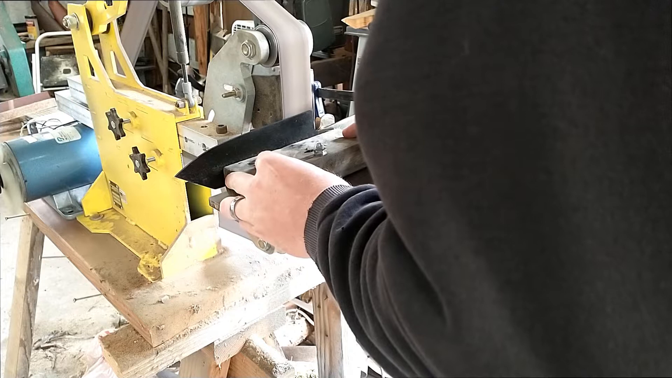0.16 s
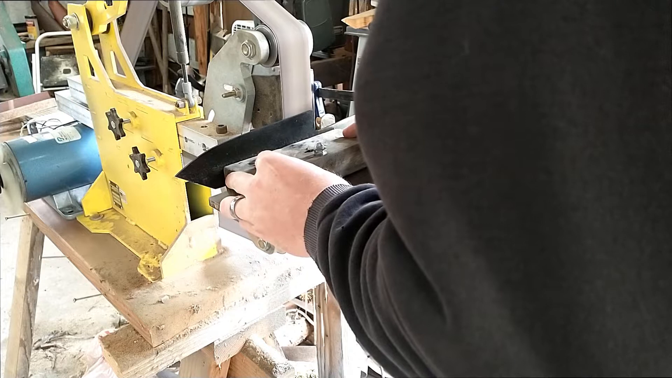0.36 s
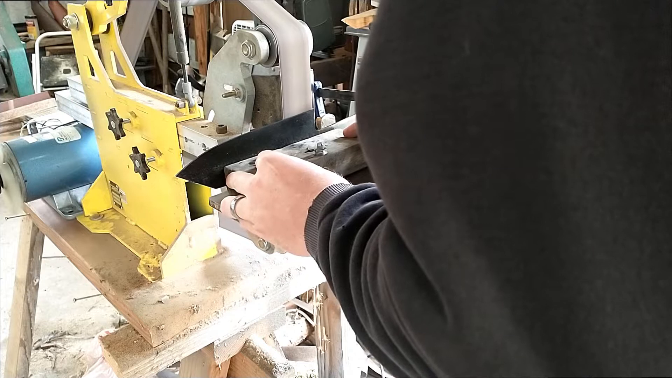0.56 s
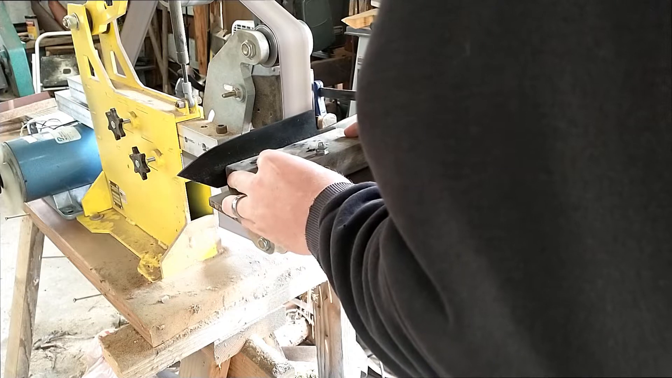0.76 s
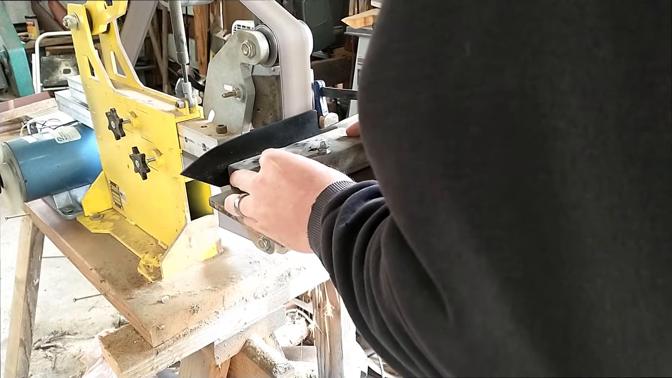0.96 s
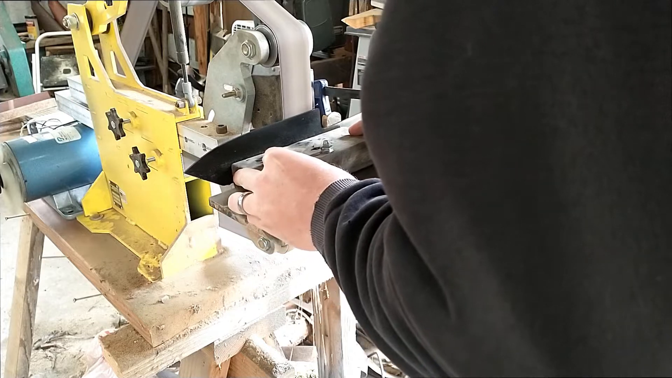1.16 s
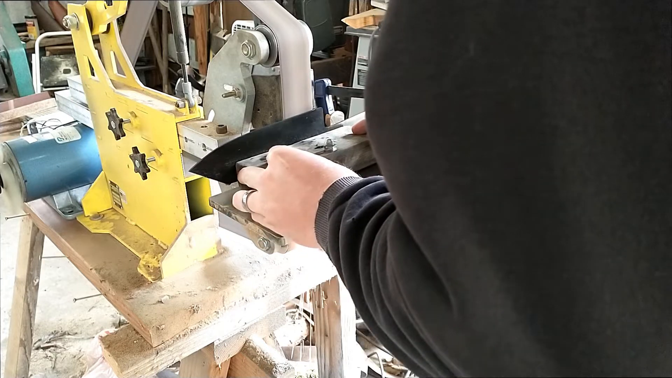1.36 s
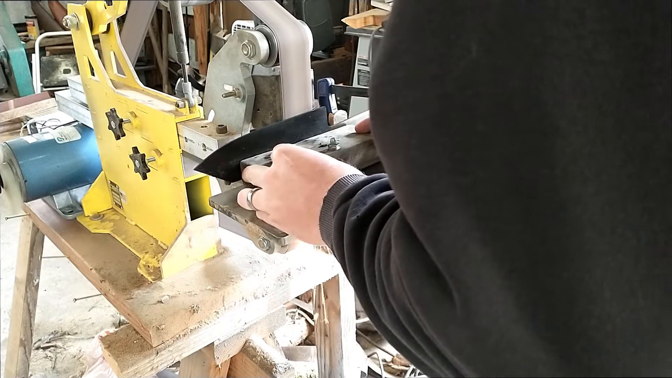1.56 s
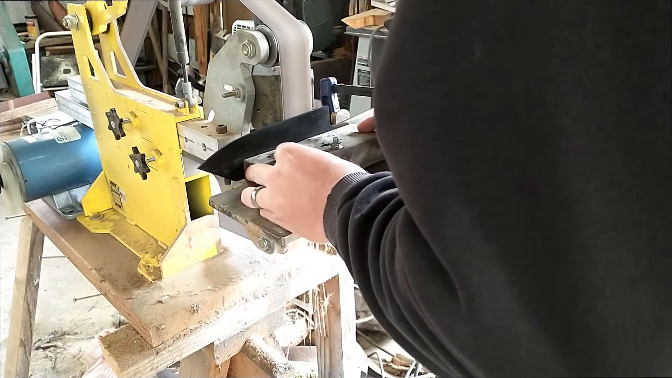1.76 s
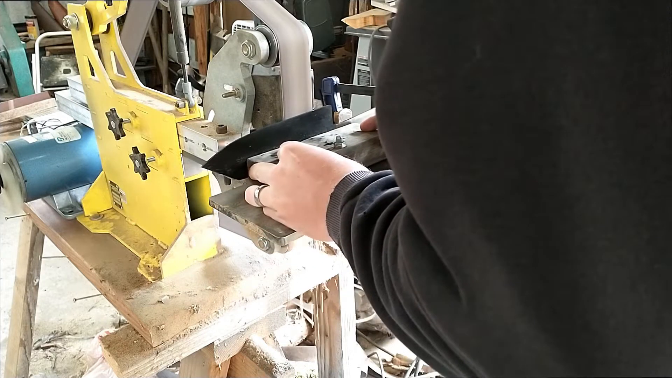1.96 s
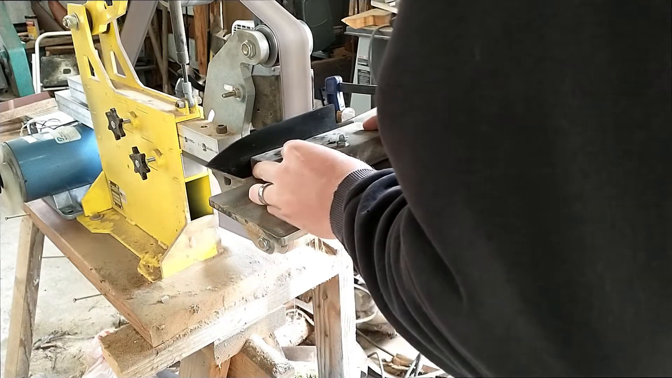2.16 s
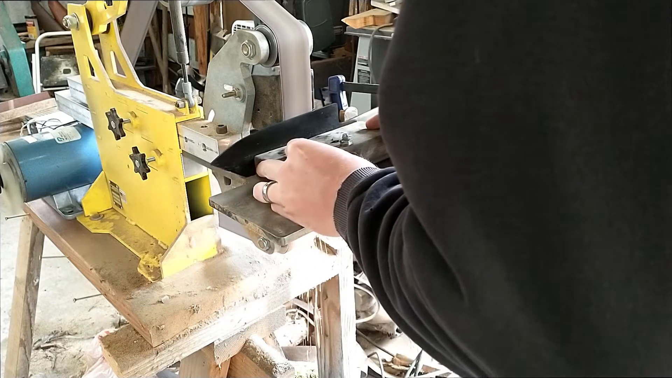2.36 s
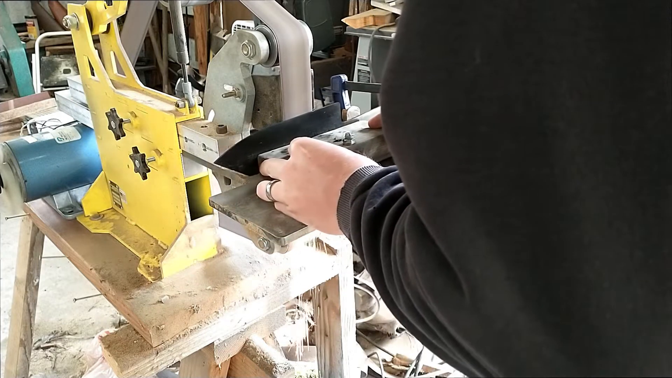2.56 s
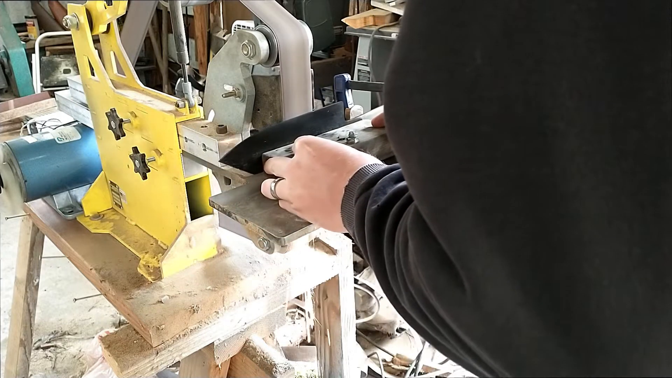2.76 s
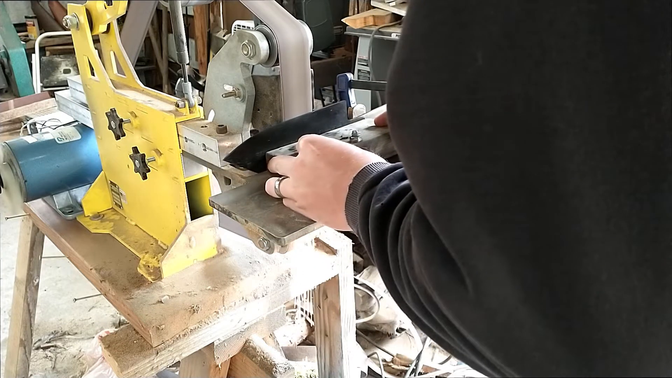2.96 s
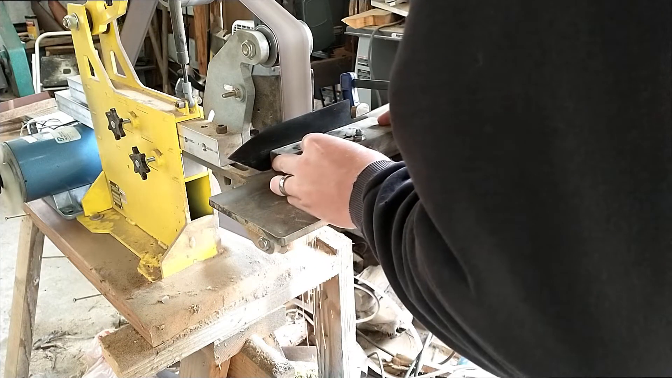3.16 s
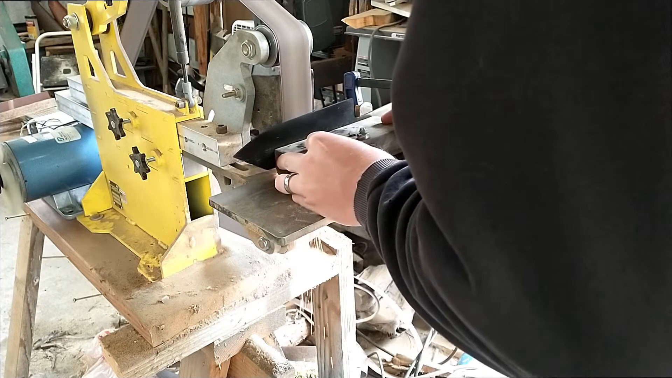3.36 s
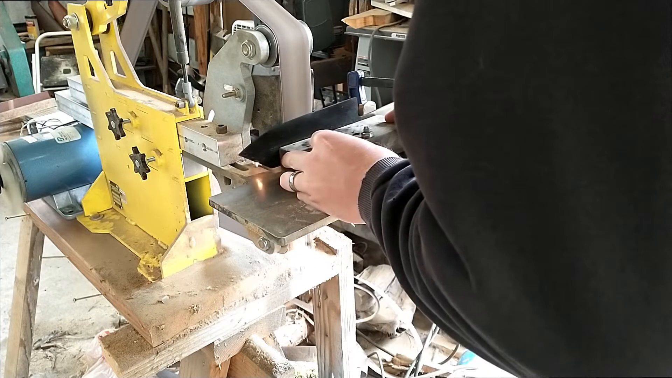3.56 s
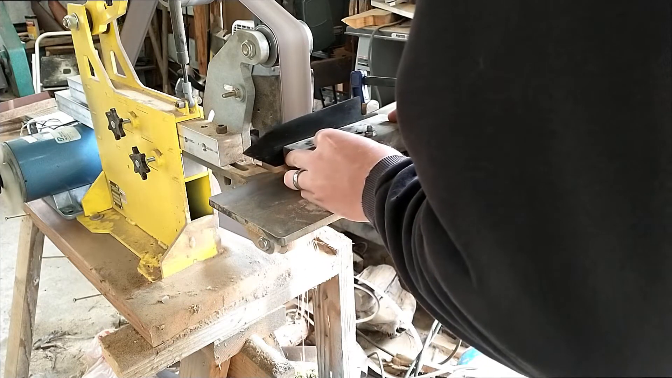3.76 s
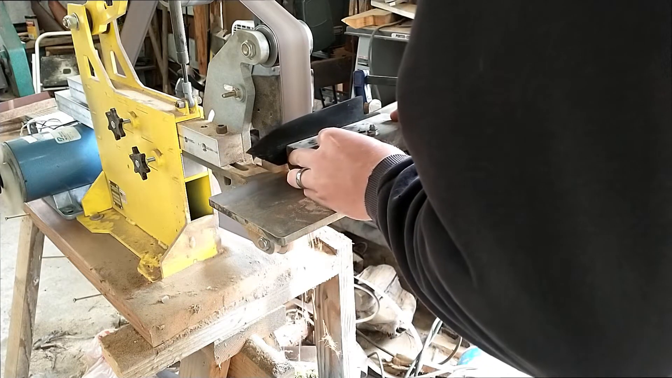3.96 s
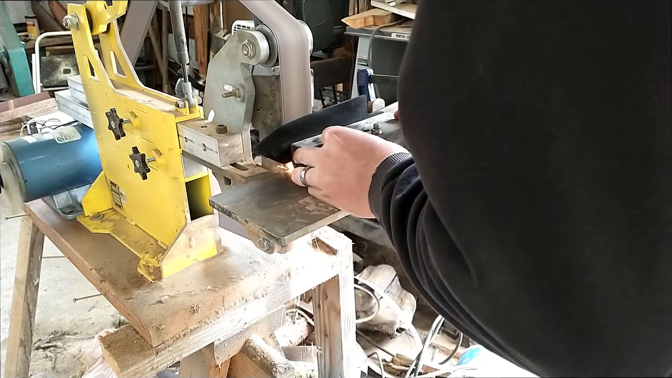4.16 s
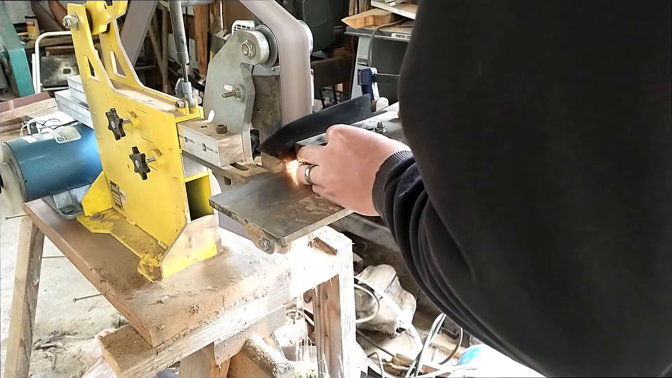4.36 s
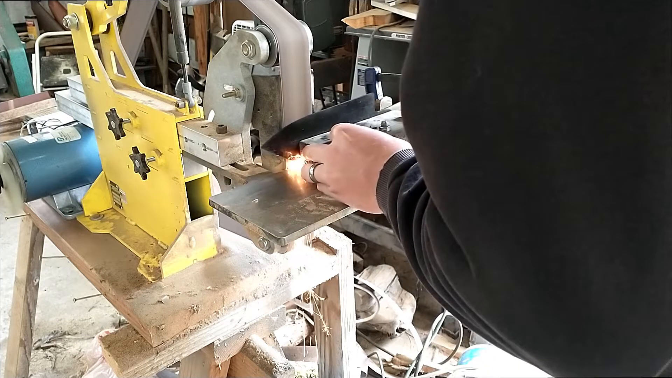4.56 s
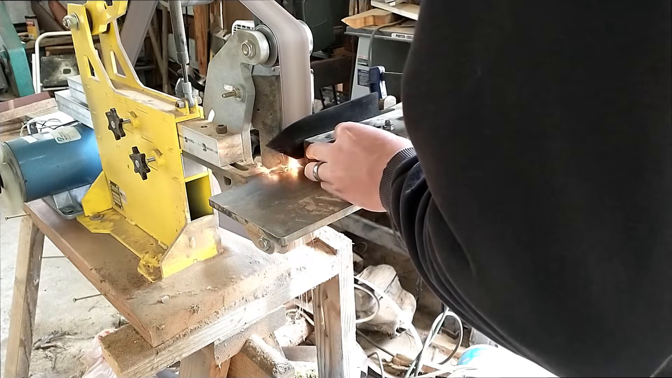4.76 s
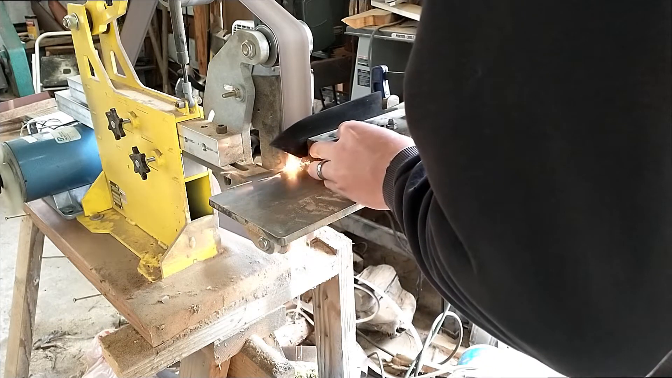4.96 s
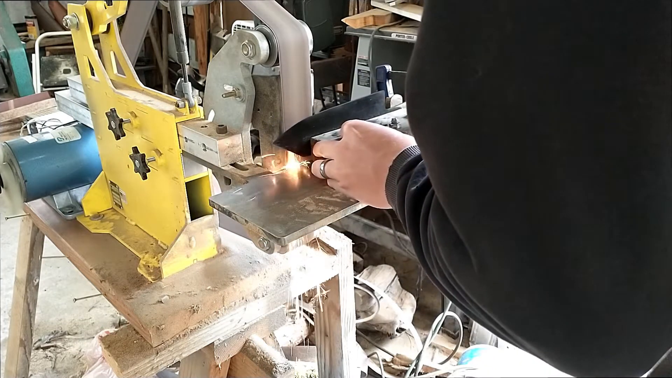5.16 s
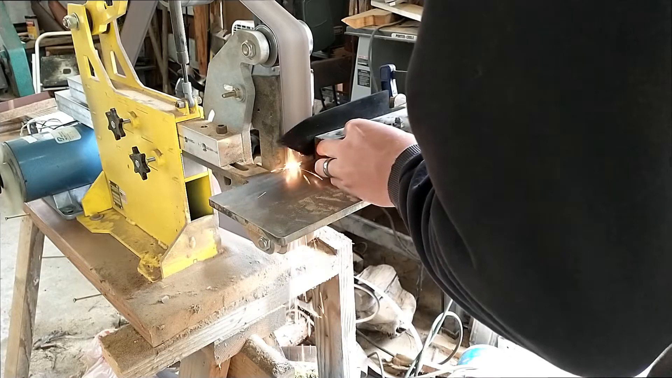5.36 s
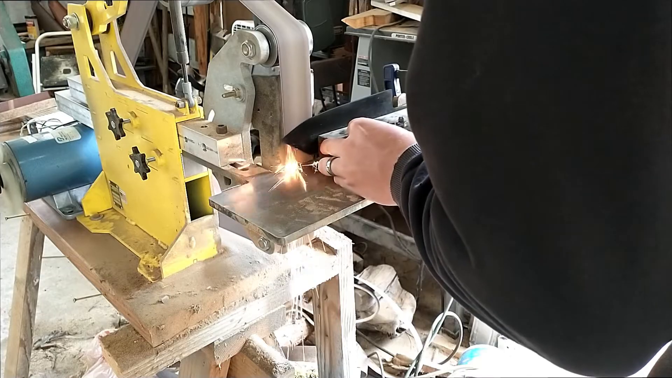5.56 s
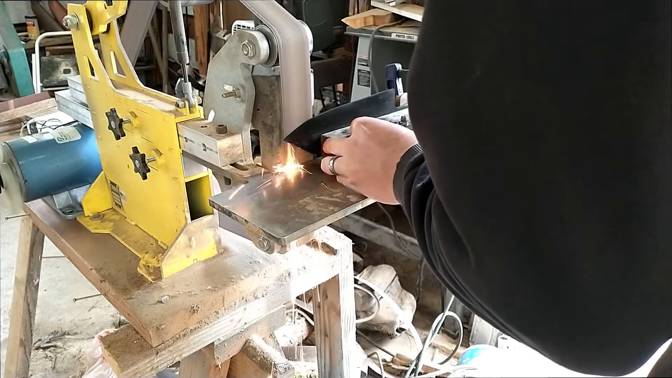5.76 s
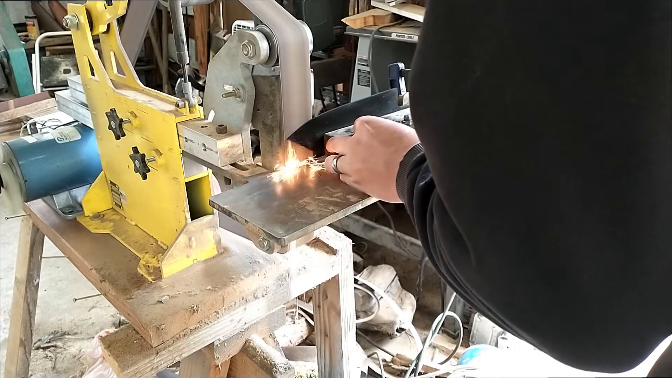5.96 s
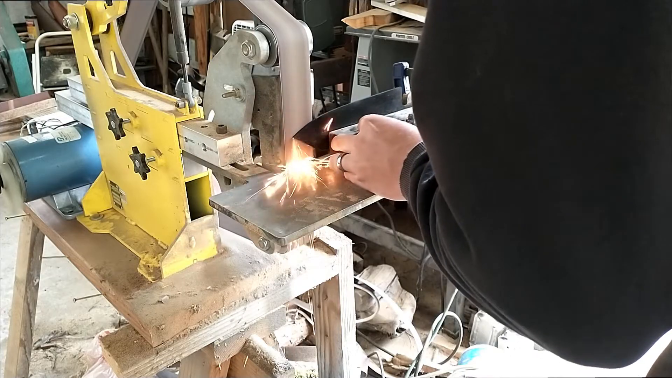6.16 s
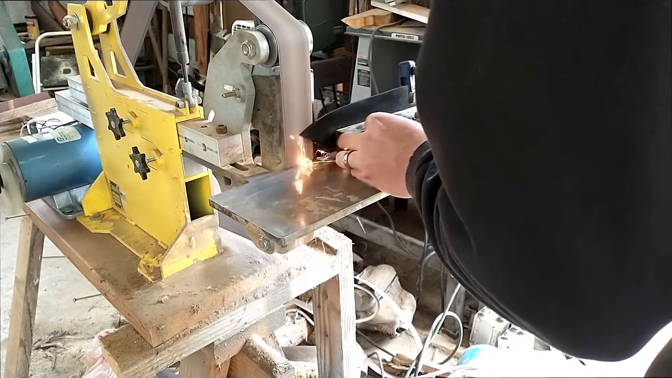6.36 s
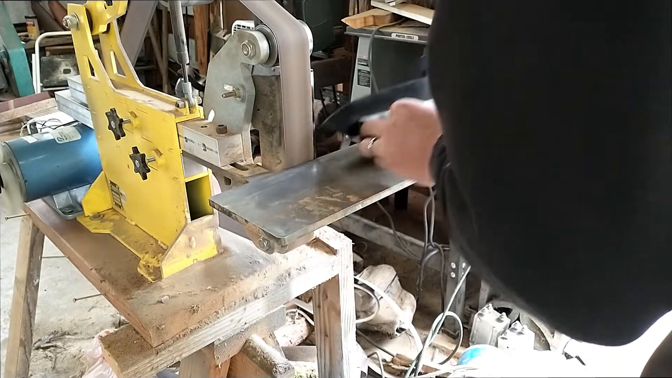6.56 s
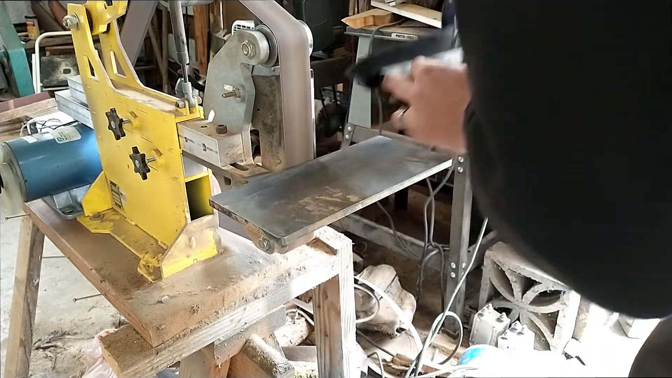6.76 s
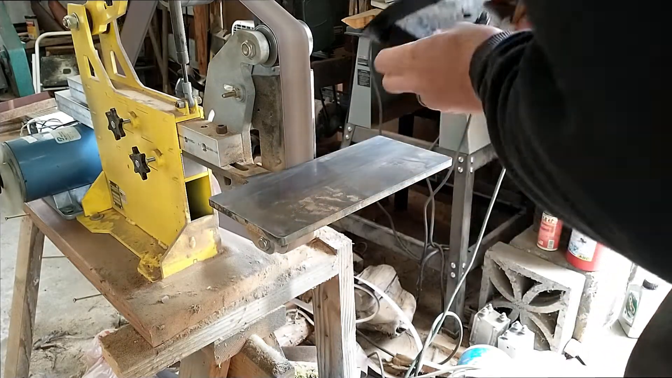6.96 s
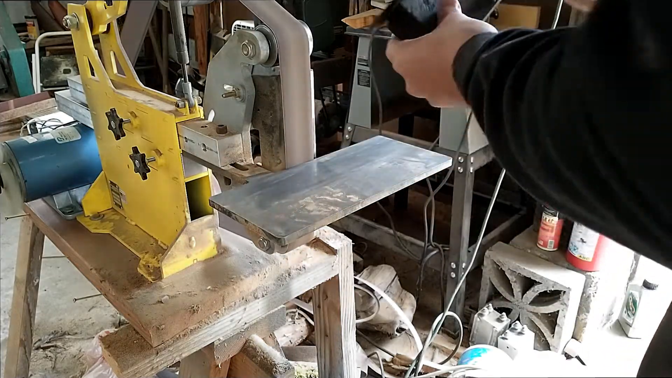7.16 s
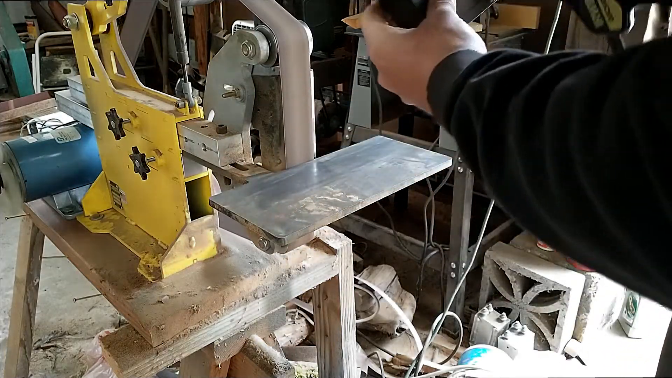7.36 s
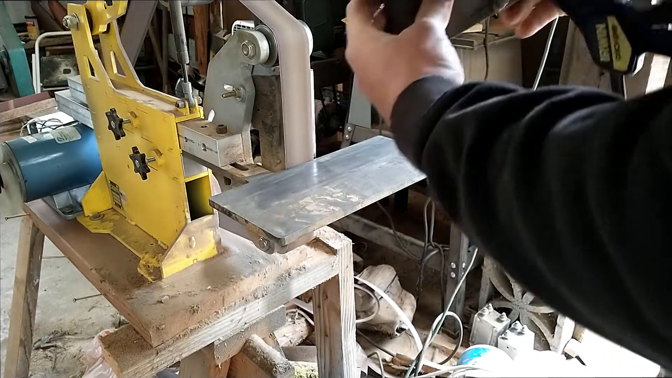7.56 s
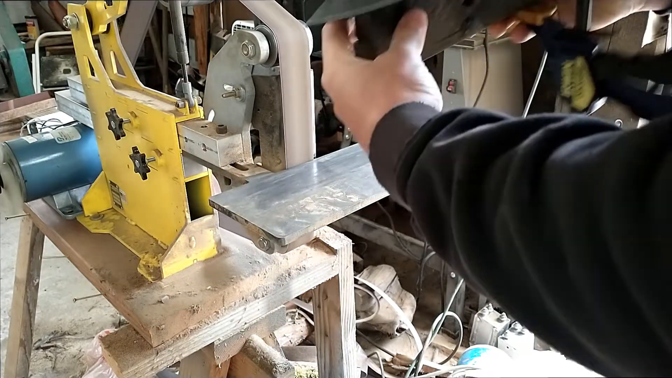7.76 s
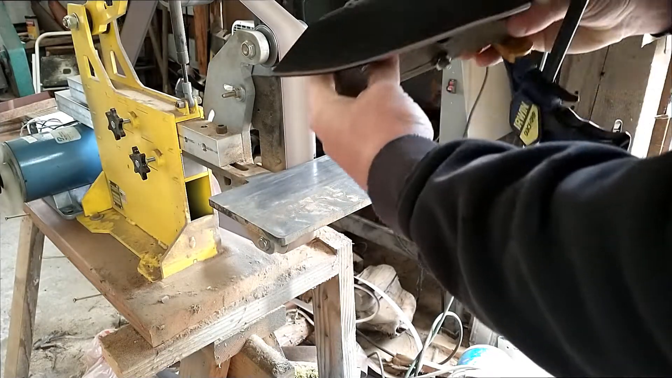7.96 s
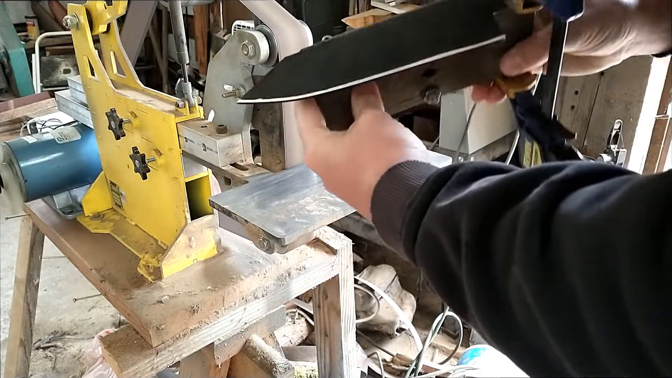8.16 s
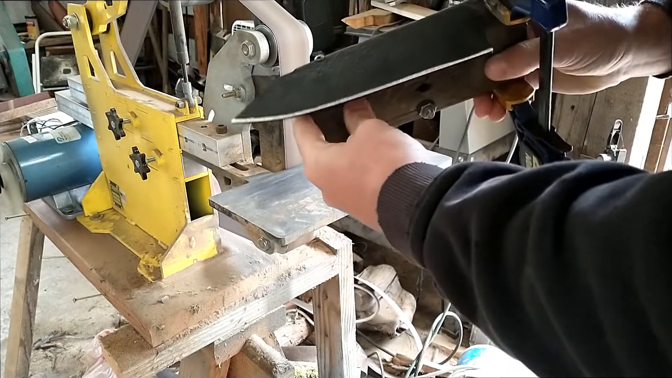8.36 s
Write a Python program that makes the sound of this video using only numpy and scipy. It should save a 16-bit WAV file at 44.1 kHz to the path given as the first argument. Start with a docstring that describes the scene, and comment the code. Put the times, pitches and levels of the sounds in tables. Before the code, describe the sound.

A belt grinder runs throughout. Steel dragged along its abrasive belt gives a loud continuous scraping hiss, slightly juddering, with wavering metallic rings and a fluttering mid-low drone beneath. The hand eases off, the tip brushes briefly, then the blade lifts clear. Only smooth airy belt noise, roller whine and low frame rumble remain. Heard close, in stereo, with dull extreme treble.

```python
"""A steel knife blade is drawn along the running belt of a belt grinder in a workshop, then lifted off.
Dense random ticks of grit and roller chatter feed the scrape's spectrum and the blade's resonances;
a short echo off the platen recolours the hiss, and bands drop out at nodes of the blade.
Under it, and alone at the end, the belt swishes as shaped noise over its rollers,
and the motor and frame hum, drone and whine as wavering tones above rumbling noise."""
import sys
import numpy as np
from scipy import signal
from scipy.fft import rfft, irfft, next_fast_len
from scipy.io import wavfile
from scipy.ndimage import map_coordinates

SR = 44100
rng = np.random.default_rng(int(sys.argv[2]) if len(sys.argv) > 2 else 0)


def persist_wave(psi):
    """Save psi, clipped to +-1, as 16-bit WAV."""
    counts = np.round(np.clip(psi, -1, 1) * 32767).astype(np.int16)
    wavfile.write(sys.argv[1], SR, np.atleast_2d(counts).T)


N = 371615
TIME, SIZE = np.arange(N) / SR, next_fast_len(N, True)
MOTOR_HZ, ROLLER_HZ, BELT_HZ = 50, 80, 12.5
STROKE_S, LIFT_S = 5.5, 6.2
# place of the contact along the blade: 0 at the heel, 1 at the tip
PLACE = np.minimum(TIME / STROKE_S, 1)
# load of the steel on the machine: 1 while it bears on the belt, 0 once it has eased off
LOADED = np.interp(TIME, [5.3, 5.6], [1, 0])


def amp(db):
    """Decibels to gain."""
    return 10 ** (np.asarray(db) / 20)


def evened(x):
    """Scales to rms 1."""
    return x / np.sqrt(np.mean(x ** 2) + 1e-20)


def curves(rows):
    """Each column of a timed table, at every sample."""
    s, *columns = np.transpose(rows)
    return [np.interp(TIME, s, c) for c in columns]


def read(points):
    """A spectrum table at every frequency bin, interpolated over log frequency."""
    hz, value = np.transpose(points)
    return np.interp(np.log(np.fft.rfftfreq(SIZE, 1 / SR) + 1), np.log(hz), value)


def coloured(x, points):
    """Filters x by a spectrum table, at rms 1."""
    return evened(irfft(rfft(x, SIZE) * amp(read(points)), SIZE)[..., :N])


def passing(s, length):
    """A smooth bell-shaped swell around a moment."""
    return np.exp(-.5 * ((TIME - s) / length) ** 2)


def wander(rate_hz):
    """Smooth random motion of rms 1, mostly slower than a rate."""
    coarse = rng.standard_normal(4096)
    rolloff = 1 + (np.arange(2049) * SR / N / rate_hz) ** 4
    coarse = irfft(rfft(coarse) / rolloff)
    return evened(np.interp(TIME, np.linspace(0, N / SR, len(coarse)), coarse))


# likeness of left and right: (frequency [Hz], likeness [0-1])
STEREO_LIKENESS = [(25, 0.25), (70, 0.1), (150, 0.6), (270, 0.6), (500, 0.45), (1200, 0.52), (2400, 0.21),
                   (5000, 0.27), (10000, 0.19)]


def spread(pair):
    """Two unrelated signals become a partly alike left and right."""
    a, b = rfft(pair, SIZE)
    same = np.clip(read(STEREO_LIKENESS), 0, 1)
    mid, side = a * np.sqrt((1 + same) / 2), b * np.sqrt((1 - same) / 2)
    return irfft(np.array([mid + side, mid - side]), SIZE)[:, :N]


def noise():
    """Random noise at both ears, partly alike."""
    return spread(rng.standard_normal((2, N)))


def revolving(hz):
    """The same roughness comes round with every turn of a wheel or lap of the belt."""
    surface = rng.standard_normal((2, round(SR / hz)))
    return spread(surface[:, np.arange(N) % surface.shape[1]])


def ring(x, hz, width):
    """A steep resonance from a doubled pole pair, at rms 1."""
    pole = np.exp((2j * hz - width) * np.pi / SR)
    poles = np.poly([pole, pole.conjugate()] * 2).real
    return evened(signal.lfilter([1, 0, -1], poles, np.diff(x, prepend=0)))


def gliding(x, hz, width):
    """A steep resonance that follows a pitch curve, at rms 1: shift down, smooth twice, shift back."""
    turn = np.exp(2j * np.pi * np.cumsum(hz) / SR)
    r = np.exp(-np.pi * abs(width) / SR)
    smoothed = signal.lfilter([1], np.poly([r, r]), x * turn.conj())
    return evened((turn * smoothed).real)


def tone(hz, drift, apart=0.74):
    """A sine of rms 1; its phase wavers by drift [rad rms] and lies apart [rad] between the ears."""
    phase = 2 * np.pi * (hz * TIME + rng.random()) + drift * wander(6.5)
    return np.sqrt(2) * np.sin(np.array([phase + apart / 2, phase - apart / 2]))


# the frame's rumble: (time [s], level before trim [dB])
RUMBLE_LEVEL = [(0, -70), (.9, -75.5), (1.6, -72.5), (2.3, -76.5), (3.45, -68), (4, -73.5), (5.3, -72),
                (5.7, -74), (6.8, -63), (8.43, -61.5)]
# colour of the rumble: (frequency [Hz], relative density [dB per Hz])
FRAME_COLOUR = [(20, -26.5), (50, -24.5), (115, -20), (170, -4), (250, -3), (340, 3.5), (450, -5),
                (800, -17), (2000, -53.5)]


def rumble(trim_db=2):
    """The motor shakes the frame: low noise mixed with a roughness that repeats every motor turn."""
    shaking = noise() + 0.63 * revolving(MOTOR_HZ)
    return amp(curves(RUMBLE_LEVEL)[0] + trim_db) * coloured(shaking, FRAME_COLOUR)


# rush of the rollers in the frame: (time [s], level before trim [dB])
RUSH_LEVEL = [(0, -55), (.9, -56), (1.55, -54.5), (2, -58), (2.6, -58.5), (3.1, -54), (3.6, -57),
              (3.9, -61.5), (4.65, -53), (6.1, -58), (7.4, -56), (8.43, -52.5)]
# colour of the rush: (frequency [Hz], relative density [dB per Hz])
ROLLERS_COLOUR = [(20, -15.5), (70, -24.5), (150, -24), (260, -15), (350, -8.5), (450, 5.5), (560, 2),
                  (780, 1), (950, -5), (1250, -6.5), (2500, -55)]


def rush(trim_db=2.5):
    """The rollers rush in the frame: shaped noise with a little of each motor turn."""
    rolling = noise() + 0.2 * revolving(MOTOR_HZ)
    return amp(curves(RUSH_LEVEL)[0] + trim_db) * coloured(rolling, ROLLERS_COLOUR)


# steady tones of motor and roller: (pitch [Hz], level before wavering and load [dB])
LESSER_TONES = [(200, -85.5), (240, -73), (250, -75), (390, -78), (700, -69.5), (960, -69.5), (1200, -72),
                (1300, -82)]


def lesser_tones(damped_db=-4):
    """Lines of motor and roller waver, rise and fall with the rumble, and are damped by the load."""
    lines = sum(amp(db + 2.4 * wander(7.8)) * tone(hz, 0.35) for hz, db in LESSER_TONES)
    follow = evened(amp(curves(RUMBLE_LEVEL)[0]))
    return follow * amp(damped_db * LOADED) * lines


# the roller's whine: (time [s], level before trim and swell [dB])
WHINE_LEVEL = [(0, -67), (5.9, -69.5), (6.4, -60.5), (7.3, -54.5), (8.43, -51.5)]


def whine(trim_db=-4):
    """The roller whines at its ninth harmonic, swelling and sinking slowly."""
    crest_s, period_s, swell_db = 7.22, .465, 2.5
    swell = swell_db * np.cos(2 * np.pi * (TIME - crest_s) / period_s)
    level_db = curves(WHINE_LEVEL)[0] + trim_db + swell + wander(11)
    return amp(level_db) * tone(9 * ROLLER_HZ, 0.64, apart=0.79)


# the frame's drone: (time [s], level before load [dB])
DRONE_LEVEL = [(0.0, -64), (0.02, -61.5), (0.77, -65.5), (0.84, -51.5), (1.15, -57), (1.38, -43),
               (1.45, -51), (2.09, -63), (2.2, -48.5), (2.35, -56), (2.39, -48), (2.74, -65), (2.81, -53),
               (2.93, -47), (3.07, -55.5), (3.38, -44), (3.66, -54), (4.03, -43), (4.29, -50.5),
               (5.33, -56.5), (5.51, -45), (5.8, -45), (5.96, -53), (6.34, -46.5), (6.41, -52), (6.76, -54),
               (6.88, -64), (6.99, -49), (7.3, -51.5), (7.42, -44.5), (7.63, -53), (8.03, -56),
               (8.17, -44.5), (8.43, -57.5)]
# frame modes on either side of the drone: (pitch [Hz], pole width [Hz], relative level [dB])
RATTLE_MODES = [(465, 34, -1.5), (505, 41, -3.5), (545, 32, -8.5)]


def drone(shaking):
    """The frame drones at the roller's sixth harmonic; under load it flutters and rattles more."""
    level_db = curves(DRONE_LEVEL)[0]
    rattle_db = -30 + 0.65 * level_db + 8.3 * LOADED
    modes = sum(amp(db) * ring(shaking, hz, width) for hz, width, db in RATTLE_MODES)
    load_db = LOADED * (1.8 * wander(22) - 3.2)
    line = amp(level_db + load_db) * tone(6 * ROLLER_HZ, 0.3, apart=0.35)
    return line + amp(rattle_db) * modes


# frame and work rest ring for a moment under load:
# (time [s], half length [s], pitch [Hz], pole width [Hz], level [dB])
SHUDDER_EVENTS = [(0.2, 0.25, 335, 90, -62.5), (1.65, 0.16, 655, 90, -57.5), (2.3, 0.16, 323, 80, -66),
                  (2.38, 0.14, 813, 70, -54), (2.55, 0.15, 915, 70, -57), (2.95, 0.2, 770, 120, -60),
                  (3.4, 0.1, 793, 110, -53.5), (4.3, 0.11, 535, 70, -51.5), (5.05, 0.27, 335, 90, -66)]


def shudders(shaking):
    """Resonances of the frame and work rest swell up and die away."""
    return sum(amp(db) * passing(s, length) * ring(shaking, hz, width)
               for s, length, hz, width, db in SHUDDER_EVENTS)


# faint singing of the work rest: (time [s], half length [s], level [dB])
REST_EVENTS = [(2.35, 0.16, -56.5), (3.55, 0.31, -58.5), (4.75, 0.18, -61)]


def rest_singing():
    """The work rest sings faintly at the roller's tenth harmonic."""
    swells = sum(amp(db) * passing(s, length) for s, length, db in REST_EVENTS)
    return swells * tone(10 * ROLLER_HZ, 0.45)


# the motor's hum: (time [s], level before trim [dB])
HUM_LEVEL = [(0, -90), (2.15, -80.5), (2.35, -56), (2.58, -60), (2.8, -72.5), (3.4, -68), (4.0, -74),
             (6.2, -71), (7.2, -59), (7.9, -71), (8.3, -59)]


def motor_hum(shaking, hum_db=-8, buzz_db=-8):
    """A line at the motor's third harmonic, blurred by a noisy resonance beside it."""
    line = amp(hum_db) * tone(3 * MOTOR_HZ, .3, apart=0.46)
    buzz = amp(buzz_db) * ring(shaking, 155, 14)
    return amp(curves(HUM_LEVEL)[0]) * (line + buzz)


def machine():
    """Motor and rollers shake the frame; both groups of sounds lean a little to the left."""
    shaking = noise()
    running = rumble() + rush() + drone(shaking) + whine() + lesser_tones()
    humming = motor_hum(shaking) + shudders(shaking) + rest_singing()
    return running * amp([[1.5], [-1.5]]) + humming * amp([[.5], [-.5]])


# colour of the free belt: (frequency [Hz], relative density [dB per Hz])
SWISH_COLOUR = [(300, -28), (700, -18.5), (1200, -8.5), (2050, -12), (2290, -9.5), (2420, -13), (2700, -11),
                (2930, -6), (3080, -8.5), (3700, -2), (4250, -7.5), (4950, -2.5), (5250, -6), (5750, -4.5),
                (6050, -7.5), (6600, -8.5), (7200, -15), (7950, -25), (9100, -31), (9900, -49.5)]


def belt(swish_db=-43.0, fade_db_per_s=0.48, flutter_db=0.67):
    """The belt swishes over its rollers, fluttering a little and settling once the steel is off."""
    level_db = swish_db - fade_db_per_s * np.maximum(TIME - LIFT_S, 0)
    rubbing = noise() + 0.052 * revolving(MOTOR_HZ)
    return amp(level_db + flutter_db * wander(25)) * coloured(rubbing, SWISH_COLOUR)


def grit(repeat=0.19, lap=0.14):
    """Abrasive grains tick on the steel, over roughness repeating with the drive wheel and belt lap."""
    grains_per_s, grain_size_db = 30000, 0.6
    size = amp(grain_size_db * np.minimum(rng.exponential(1, (2, N)), 5))
    size = size * rng.choice([-1, 1], (2, N))
    ticks = evened(size * (rng.random((2, N)) < grains_per_s / SR))
    return spread(ticks) + repeat * revolving(MOTOR_HZ) + lap * revolving(BELT_HZ)


# the roller's chatter, one entry a line: (multiple of the roller speed)
CHATTER_MULTIPLES = [15, 25, 31, 50, 56, 69, 70, 75, 94]
# (level at mid-stroke against the grit [dB])
CHATTER_LEVELS = [-22.5, -30, -27.5, -37, -30, -35, -25, -30.5, -32]
# (gain from heel to tip [dB])
CHATTER_RISES = [-9, 2.5, -4.5, 2, 2, 0, 0.5, 0, -0.5]


def roller_chatter():
    """The roller chatters against the steel in wavering harmonics of its speed."""
    return sum(amp(db + rise_db * (PLACE - .5) + 2 * wander(8.1)) * tone(k * ROLLER_HZ, 0.45, apart=1.0)
               for k, db, rise_db in zip(CHATTER_MULTIPLES, CHATTER_LEVELS, CHATTER_RISES))


# echo off the platen as the blade slides: (time [s], delay [ms], signed share of the direct sound)
PLATEN_ECHO = [(0.1, 0.64, 0.33), (0.5, 0.67, 0.15), (0.9, 0.59, -0.1), (1.5, 0.63, 0.13),
               (2.2, 0.68, -0.11), (2.8, 0.71, -0.11), (3.2, 0.63, 0.34), (3.65, 0.59, -0.31),
               (4.15, 0.5, -0.38), (4.55, 0.55, -0.12), (4.9, 0.49, -0.058), (5.3, 0.2, 0.15)]


def near_echoes(x):
    """A short, changing echo path combs the hiss."""
    ms, share = curves(PLATEN_ECHO)
    at = np.arange(N) - ms * SR / 1000
    echo = np.array([map_coordinates(side, [at], order=3) for side in x])
    return (x + share * echo) / np.sqrt(1 + share ** 2)


def flexing(blows, hz, db, width=88, drift=1.24):
    """A low ring of the blade, struck by grit; the stronger it is, the more the rub sustains a line."""
    most_share, onset_db, span_db = 0.74, -22, 9
    share = most_share * np.clip((db - onset_db) / span_db, 0, 1)
    ears = np.array([0.66 * wander(14) for _ in range(2)])
    phase = 2 * np.pi * np.cumsum(hz) / SR + drift * wander(22) + ears
    struck = np.sqrt(1 - share ** 2) * gliding(blows, hz, width)
    return amp(db) * (struck + share * np.sqrt(2) * np.sin(phase))


# two low rings that shift with the grip, levels against the contact:
# (time [s], lower pitch [Hz], its level [dB], upper pitch [Hz], its level [dB])
FLEX_RINGS = [(0.0, 1260, -15, 1376, -21), (0.5, 1231, -22.5, 1380, -15.5), (0.8, 1230, -15.5, 1401.0, -20),
              (1.15, 1236, -11, 1415, -16), (1.5, 1252, -12.5, 1390, -12.5), (1.8, 1283, -12.5, 1408, -17),
              (2.15, 1300, -14, 1395, -12), (2.45, 1263, -19, 1376, -14), (2.7, 1258, -11.5, 1391.0, -22),
              (3.0, 1263, -8, 1394, -15.5), (3.4, 1242.0, -11, 1420, -14), (3.7, 1270, -16, 1393, -14.5),
              (4.0, 1273, -26, 1387, -17.5), (4.4, 1257, -17.5, 1392, -15.5), (4.8, 1262, -25, 1378, -22.5),
              (5.4, 1253, -19, 1405, -18.5)]
# rings heard only while the contact passes one spot:
# (time [s], half length [s], pitch [Hz], pole width [Hz], level against the contact [dB])
SPOT_RINGS = [(0.453, 0.35, 1193, 60, -19.5), (0.99, 0.31, 1092, 57, -15), (1.3, 0.2, 1136, 49.7, -17.5),
              (1.65, 0.2, 4200, 330, -14.5), (2.45, 0.2, 5200, 280, -11), (3.1, 0.17, 3326, 190, -14.5),
              (3.35, 0.2, 1610, 140, -19), (3.88, 0.14, 4130, 220, -12), (4.282, 0.08, 1760, 200, -15),
              (4.4, 0.09, 4760, 380, -14), (4.58, 0.18, 4016, 140, -13), (4.8, 0.5, 1032, 90, -25.5),
              (4.83, 0.14, 5330, 240, -11), (5.22, 0.25, 7700, 900, -27)]
# modes of the blade, with place 0 at the heel and 1 at the tip:
# (pitch at mid-stroke [Hz], pole width [Hz], level at mid-stroke against the contact [dB],
#  place of an antinode [0-1 is on the blade], antinode spacing [same scale], gain heel to tip [dB],
#  pitch gain heel to tip [Hz], depth of the dip at a node [0-1])
BLADE_MODES = [(1705, 216, -17, 0.37, 0.42, 12, 186, 0.4), (2249, 200, -14.5, 0.73, 1, 6.5, -32.5, 0.58),
               (2515, 160, -13.5, 0.487, 0.78, 7, 40, 0.98),
               (2816, 244, -12, 0.102, 0.334, 2.5, -116.0, 0.56),
               (3170, 110, -18.5, 0.03, 0.77, -7, 76.5, 1), (3297, 360, -9, 0.515, 0.67, 9.5, -44.5, 0.84),
               (3623, 202.0, -17, 0.32, 0.5, -1.09, 48.5, 1),
               (3960, 220, -6.5, -0.034, 0.43, -7.5, 38.5, 0.53),
               (4176, 108, -9, 0.254, 0.44, -6.5, -3, 0.38), (4426, 220, -15, 0.53, 0.51, -0.5, -24.5, 0.4),
               (4857, 170, -8, 0.13, 0.54, -2, 22.5, 0.55), (4913, 170, -12.5, 0.703, 0.24, 8, 40, 0.8),
               (5231.0, 240, -13, 0.036, 0.73, 12, 110, 0.7), (5685, 170, -15, 0.98, 0.87, 4, 17.5, 0.7),
               (5900, 330, -9, 0.074, 0.5, 4.5, -66, 1.0),
               (6650, 289.0, -20.5, 0.265, 0.26, 10.5, -62.5, 0.6)]


def singing(blows):
    """Each blade mode drifts in pitch and sings as the sliding contact passes its antinodes."""
    lower_hz, lower_db, upper_hz, upper_db = curves(FLEX_RINGS)
    out = flexing(blows, lower_hz, lower_db) + flexing(blows, upper_hz, upper_db)
    for s, length, hz, width, db in SPOT_RINGS:
        out += amp(db) * passing(s, length) * ring(blows, hz, width)
    for hz, width, db, antinode, spacing, rise_db, drift_hz, depth in BLADE_MODES:
        swing = 1 - np.clip(depth, 0, 1) * np.sin(np.pi * (PLACE - antinode) / spacing) ** 2
        mode = gliding(blows, hz + drift_hz * (PLACE - .5), width)
        out += amp(db + rise_db * (PLACE - .5)) * swing * mode
    # a thin, wavering squeal of the edge
    out += amp(-22 + 3 * wander(6.8)) * tone(4990, 0.9)
    # the blade's rings are kept out of the bass
    return signal.sosfilt(signal.butter(4, 750, "highpass", fs=SR, output="sos"), out)


# the contact crosses a node and a band drops out:
# (time [s], half length [s], pitch [Hz], width [Hz], depth [0-1])
NODE_DIPS = [(0.07, 0.14, 7147.0, 890, 0.4), (0.07, 0.47, 2570, 421.0, 0.73), (0.08, 0.34, 3380, 336, 0.9),
             (0.09, 0.23, 4460, 363.0, 0.5), (0.14, 0.16, 5230, 450, 0.8), (0.762, 0.35, 6100, 646.0, 0.74),
             (1.03, 0.58, 4790, 670.0, 0.77), (3.018, 0.41, 3120, 172.0, 0.5), (3.62, 0.2, 5250, 635, 0.8),
             (3.763, 0.16, 6660, 670, 0.5), (3.87, 0.25, 2740, 384.0, 0.46), (4.54, 0.17, 6100, 728.0, 0.9),
             (4.62, 0.16, 4630, 576.0, 0.6), (4.718, 0.29, 3570, 411.0, 0.67), (0.798, 0.76, 903, 200, 1),
             (1.5, 0.22, 7860, 900, 0.6), (2.9, 0.2, 7700, 1200, 0.5), (4.482, 0.14, 8100, 1000, 0.6)]


def hollowed(x):
    """Nodes of the blade take a band out of the steel's sound while the contact passes them."""
    for s, length, hz, width, depth in NODE_DIPS:
        band = signal.lfilter(*signal.iirpeak(hz, hz / width, fs=SR), x)
        x = x - np.clip(depth, 0, 1) * np.exp(-.5 * abs((TIME - s) / length) ** 3) * band
    return x


def release():
    """The hand eases off, only the tip brushes the belt, then the blade lifts clear."""
    ease_s, ease_length_s, ease_db = 5.373, 0.16, -11
    brush_db_per_s, lift_length_s = -13, 0.076
    eased = np.clip((TIME - ease_s) / ease_length_s, 0, 1)
    brushing_s = np.maximum(TIME - ease_s - ease_length_s, 0)
    lifted = np.clip(1 - (TIME - LIFT_S) / lift_length_s, 0, 1)
    return amp(ease_db * eased + brush_db_per_s * brushing_s) * lifted


# bounce of the blade on the belt: (rate [Hz], depth [dB rms])
BLADE_BOUNCE = [(8.8, 0.4), (34.5, 0.25)]


def contact_unevenness():
    """Level in dB of the contact as belt, hand, drive wheel, slow sway and bounce disturb it."""
    belt_db, hand_db, wheel_db = 0.16, 0.24, 0.3
    sway_db, sway_crest_s, sway_period_s = 0.65, 0.033, 0.51
    level_db = belt_db * wander(35) + hand_db * wander(13.0)
    level_db += wheel_db * np.sin(2 * np.pi * MOTOR_HZ * TIME)
    level_db += sway_db * np.cos(2 * np.pi * (TIME - sway_crest_s) / sway_period_s)
    return level_db + sum(db * tone(hz, 1.04)[0] for hz, db in BLADE_BOUNCE)


# how hard the steel bears on the belt:
# (time [s], contact level [dB], edge fizz against the contact before trim [dB])
CONTACT_PRESSURE = [(0.0, -26.5, -31.0), (0.04, -24.5, -48), (0.17, -26.5, -41.4), (0.5, -25, -35),
                    (0.63, -26.5, -32), (0.71, -24.5, -33), (0.78, -26, -34), (0.87, -25.5, -38),
                    (1.2, -25.5, -35), (1.57, -25, -38.0), (1.87, -26, -33), (2.16, -26.5, -37.0),
                    (2.55, -28, -32), (2.9, -26.5, -43), (3.15, -28.5, -36), (3.35, -25.5, -29.4),
                    (3.58, -29, -39), (3.63, -26.5, -42), (3.67, -29, -42), (3.74, -26, -41),
                    (3.8, -28, -45), (4.04, -28, -32), (4.08, -26.5, -31), (4.12, -28, -29),
                    (4.4, -26.5, -35), (4.75, -25.5, -34), (5.05, -27.5, -39), (5.38, -27.5, -33)]
# lean of the hiss as the blade moves: (time [s], left minus right [dB])
CONTACT_PAN = [(0.0, 0), (0.8, 0.3), (1.4, 1.5), (3.3, 1), (3.9, -.6), (4.2, 2), (4.7, -1.0), (5.6, 0.5)]
# colour of the scrape: (frequency [Hz], relative density [dB per Hz])
SCRAPE_COLOUR = [(250, -42.5), (650, -35), (900, -23), (1150, -9), (1550, -8), (1900, -3.5), (2600, -5),
                 (3500, -4.5), (4300, 0.6), (5100, -2.5), (5800, 0.5), (6400, -10.5), (7200, -13),
                 (7900, -31), (9000, -36.5), (9900, -57)]


def grinding(scrape_db=-1.98, fizz_db=-6):
    """Grit scrapes and rings the blade; the hand-held contact judders with the belt and the wheel."""
    (pressure_db, bite_db), (pan_db,) = curves(CONTACT_PRESSURE), curves(CONTACT_PAN)
    chatter, strikes = roller_chatter(), grit()
    scrape = amp(scrape_db) * coloured(strikes + chatter, SCRAPE_COLOUR)
    # fine fizz of the edge's bite
    fizz = amp(bite_db + fizz_db) * ring(strikes, 8660, 850)
    steel = hollowed(near_echoes(scrape) + singing(grit() + 0.94 * chatter) + fizz)
    lean_db = np.array([pan_db, -pan_db]) / 2
    return steel * release() * amp(pressure_db + contact_unevenness() + lean_db)


def scene():
    """Steel on the belt over the running machine."""
    return machine() + belt() + grinding()


def record(dry):
    """Rolls off the top of the band with a steep linear-phase low-pass."""
    edge_hz = 10050
    lowpass = signal.firwin(511, edge_hz, window=("kaiser", 9), fs=SR)
    return signal.oaconvolve(dry, lowpass[None], "same")


dry = scene()
out = record(dry)
persist_wave(out)
```